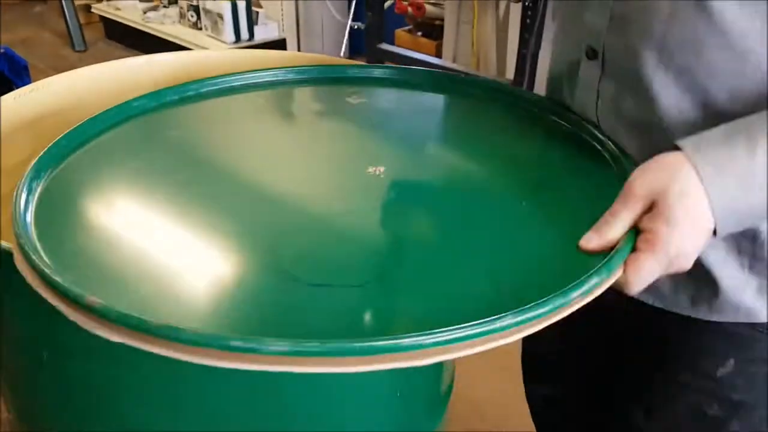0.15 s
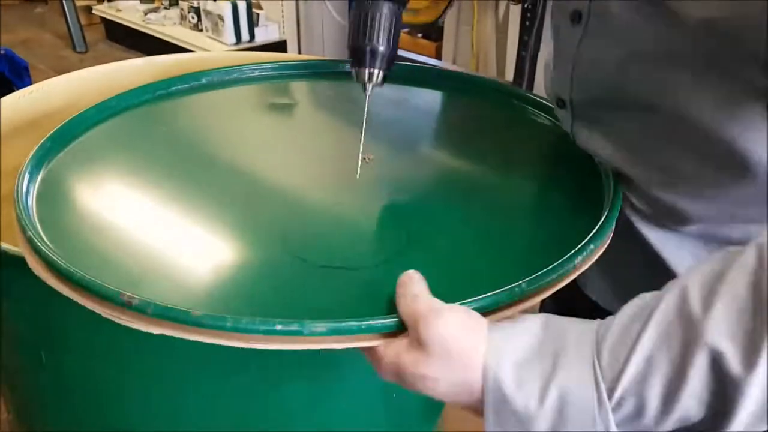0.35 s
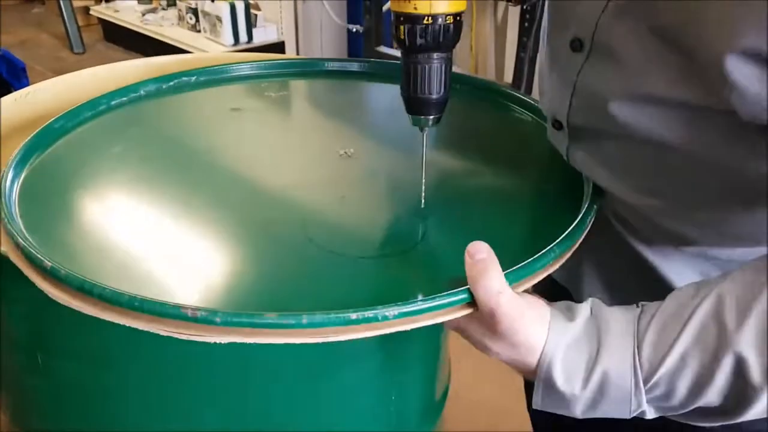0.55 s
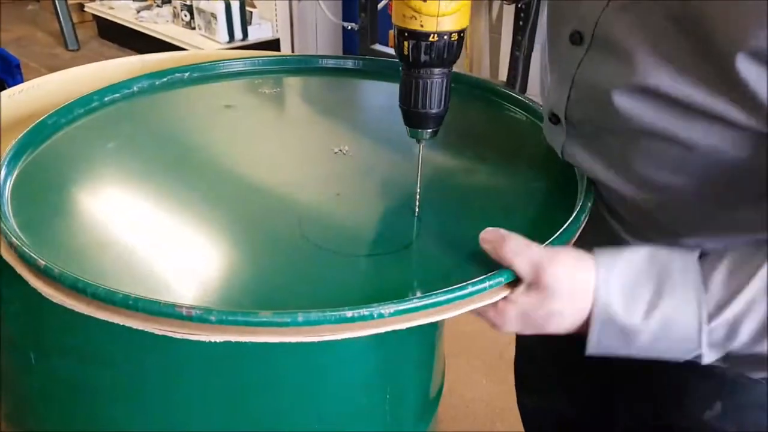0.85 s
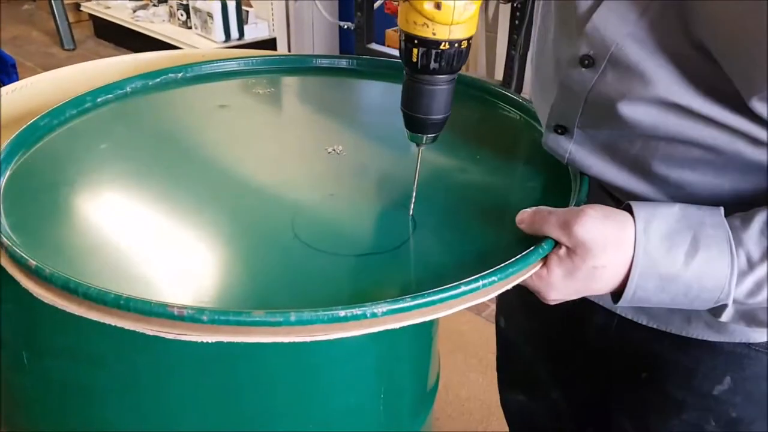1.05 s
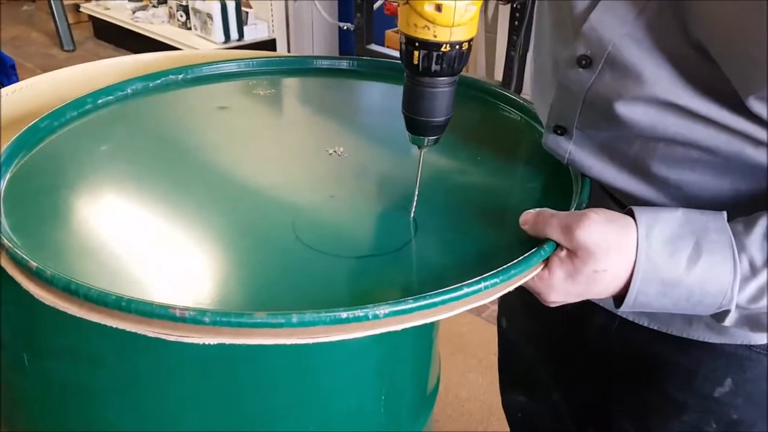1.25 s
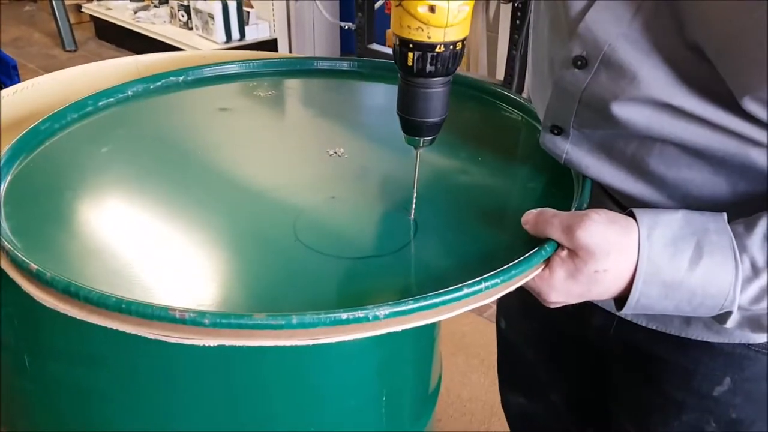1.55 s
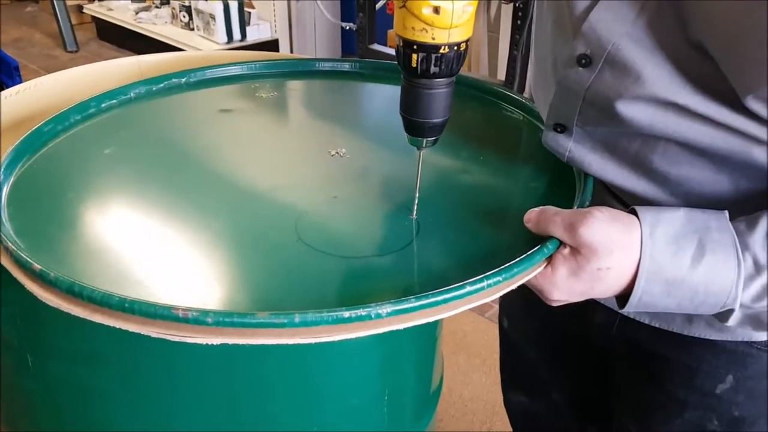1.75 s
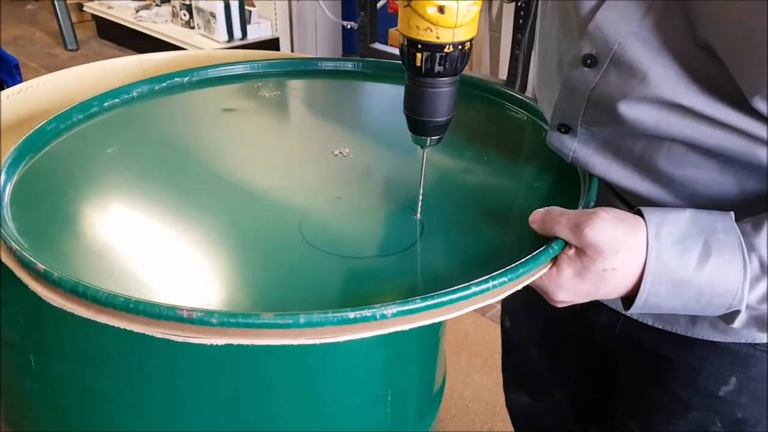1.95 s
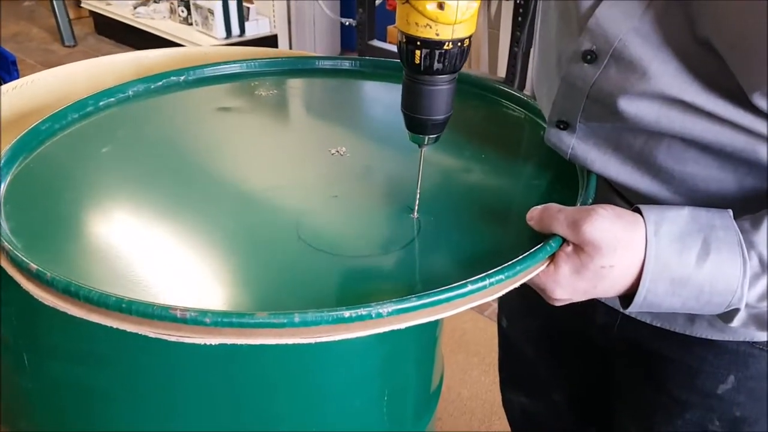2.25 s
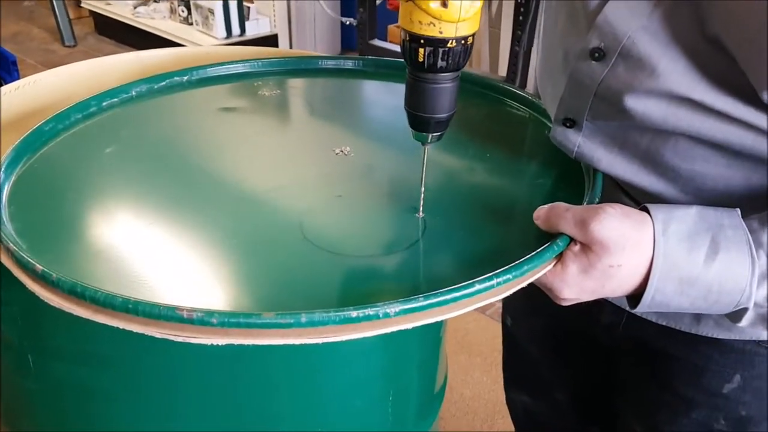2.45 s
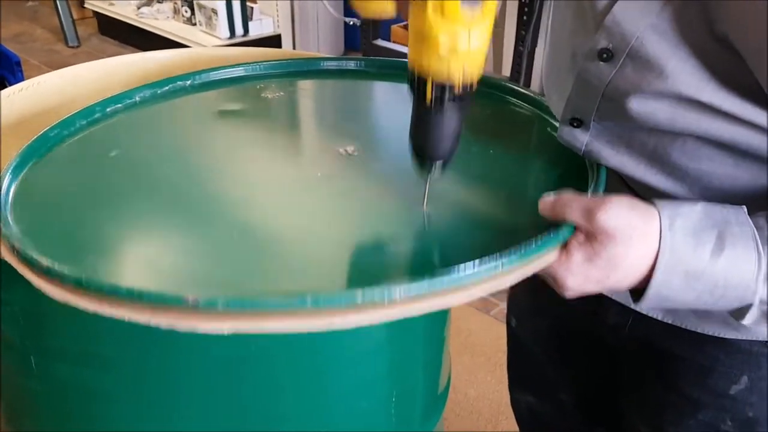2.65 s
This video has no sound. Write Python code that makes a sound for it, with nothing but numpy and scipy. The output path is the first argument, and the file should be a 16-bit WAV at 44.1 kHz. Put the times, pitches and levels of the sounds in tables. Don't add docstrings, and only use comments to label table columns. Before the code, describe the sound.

A cordless drill boring a steel drum lid, heard close in stereo in a short-echo workshop. From 0 to 0.65 s the lid rubs round, loudest near 0.15 s, with faint whistles and dull bumps. After a light tick, the drill ticks and spins up around 0.96 s, whining steadily with rattle and hiss. At 2.7 s the chuck slams, the sheet booms, chips snap, and the muffled motor continues.

```python
import sys
import numpy as np
from scipy import signal
from scipy.fft import rfft, irfft, next_fast_len
from scipy.io import wavfile
from scipy.ndimage import uniform_filter1d

SR = 44100
rng = np.random.default_rng(int(sys.argv[2]) if len(sys.argv) > 2 else 0)


def magnitude_from_level(level_db):
    exponent = np.asarray(level_db, float) / 20
    return 10 ** exponent


def put_to_file(sound):
    columns = np.atleast_2d(sound).T
    safe = np.clip(columns, -1, 1)
    whole_steps = np.round(safe * 32767)
    wavfile.write(sys.argv[1], SR, whole_steps.astype(np.int16))


N = 123479
T = np.arange(N) / SR

# (time [s], speed [turns/s])
MOTOR_SPEED = [(0.96, 120), (1.05, 270), (1.085, 345), (1.11, 394), (1.15, 426), (1.212, 443), (1.25, 443),
               (1.31, 435), (1.44, 432), (1.55, 423), (1.61, 426), (1.83, 413.5), (2.06, 413), (2.24, 407),
               (2.35, 398), (2.51, 395), (2.58, 433), (2.64, 436), (2.8, 420)]
ORDERS = [.797, 2, 2.75, 4, 4.75, 10, 12, 12.406, 12.9284, 13.0592, 13.19, 13.3208, 22.406, 23.78, 24,
          25.141]
# (level [dB rms], wobble [dB], wobble rate [1/s])
ORDER_LEVELS = [(-69, 6.0, 9), (-51, 3, 32), (-62.5, 6, 19), (-59, 2.5, 12), (-63, 4, 13),
                (-44.5, 1.13, 7.7), (-52.5, 1, 20), (-51, 0.5, 12), (-51, 2, 5.7), (-57, 0.5, 8.4),
                (-50, 1.5, 11), (-50.5, 2, 10), (-61.5, 6, 9), (-54.5, 2.5, 36), (-56, 1.5, 15),
                (-49, 2, 22)]
RUN_UP_CHANGE = [-6, -3, -6, -3, -3, 3, -12, -14, -14, -14, -14, -14, -3, -3, 4, 3]
# (time [s], level [dB])
BIT_PRESSURE = [(1.2, 1), (1.25, -3), (1.35, 3.5), (1.5, -0.5), (1.6, -3), (1.75, 1), (1.81, 5),
                (2.0, -0.5), (2.23, 0), (2.34, -0.5), (2.55, -1), (2.7, 0)]
# (frequency [Hz], width [Hz], lift [dB])
TONE_LIFTS = [(824, 27, 6), (3000, 1000, 3), (5225, 610, 8.5), (9460, 470, 10), (10470, 1000, 8)]
# (frequency [Hz], width [Hz], level [dB])
HOUSING_MODES = [(1973, 82, -57), (2850, 22, -57), (3590, 530, -52.5), (5430, 320, -48), (6120, 470, -49)]
# (time [s], peak level [dB])
GEAR_TICKS = [(1.004, -33), (1.0114, -30), (1.0176, -32), (1.0386, -32), (1.0446, -29.5), (1.05, -29)]
# (frequency [Hz], density [dB/Hz])
FAN_HISS = [(200, -28), (1200, -25), (2400, -18), (5000, -12), (9500, -10.5), (12500, -13), (14300, -17.5),
            (16000, -9.5)]
# (frequency [Hz], level [dB], t60 [s])
LID_MODES = [(220, -12.5, 0.31), (344.5, -4.5, 0.41), (487.7, -9, 0.26), (642, -6.5, 0.45),
             (824.8, 1.5, 0.14), (961, 1.5, 0.12), (1148, -2, 0.091), (1500, -0.5, 0.14), (1772, -5, 0.47),
             (1836, -7.5, 0.055), (1996, -3.5, 0.11), (2720, 5, 0.082), (3346, -15, 0.12)]
# (frequency [Hz], level [dB], t60 [s])
CHUCK_MODES = [(2200, -11.5, 0.16), (2708, -10.5, 0.26), (3240, -4.5, 0.15), (3410, -2.5, .15),
               (4204, -10, 0.096), (5486, -17, 0.089), (6557, -9, 0.13), (7600, -19, 0.085),
               (8530, -9, 0.037), (9700, -12, 0.039)]
# (time [s], level [dB])
CHUCK_HITS = [
    (2.7155, -43),
    (2.7235, -36),
    (2.7283, -27.5),
    (2.7305, -32.5),
    (2.7365, -32),
    (2.7405, -30.5),
    (2.747, -36),
    (2.753, -32.5),
    (2.758, -41.5),
]
# (time [s], level [dB], frequency [Hz], t60 [s], swell [s])
SHEET_BOOMS = [
    (2.707, -23, 290, 0.046, 0.0059),
    (2.727, -20, 829, 0.046, .002),
    (2.7275, -22, 1500, 0.033, 0.00091),
    (2.75, -29.5, 1480, .05, 0.0025),
    (2.727, -22, 404, 0.044, 0.0028),
    (2.76, -19.5, 345, 0.19, 0.0063),
    (2.71, -30, 1750, 0.071, .003),
    (2.712, -32, 230, .12, 0.0053),
    (2.748, -36, 829, 0.071, 0.0044),
]
# (time [s], level [dB], lowest [Hz], highest [Hz], t60 [s])
CHIP_SNAPS = [
    (2.7283, -18.5, 7300, 12000, .03),
    (2.736, -28, 7700, 9600, 0.063),
    (3, -30, 7000, 11000, .05),
    (2.788, -25, 9200, 15900, .02),
    (.917, -53.5, 4800, 9800, 0.027),
    (.9585, -48, 2600, 17000, 0.1),
]
# (time [s], level [dB],
# softness [Hz], crack [dB], crack t60 [s])
LID_BLOWS = [(0.736, -58, 1500, 1.5, 0.046), (.917, -63, 6000, 15, 0.025), (.933, -75, 6000, 16, .015),
             (0.9427, -70, 6000, 16, .015), (2.706, -22, 407, 5.5, 0.15), (2.713, -26, 1500, -14, 0.033),
             (2.717, -36, 1500, 2, 0.058), (2.728, -29, 5030, 9.5, 0.097), (2.7281, -37, 9000, 14.5, 0.016),
             (2.74, -36.5, 5050, 11, 0.15), (2.752, -35.5, 6000, 1, 0.088), (2.787, -39, 3000, 11, 0.16)]
# (frequency [Hz], density [dB/Hz])
CRACK_SPECTRUM = [(200, -12.5), (850, -12.5), (2500, -14), (3300, -17.5), (5000, -13), (8600, -16),
                  (16000, -16.5)]
# (peak time [s], level [dB], rise [dB/s], fall [dB/s])
LID_SLIDES = [
    (.0, -102, 300, 103),
    (0.14, -33, 199, 211),
    (0.218, -39.5, 200, 297),
    (.352, -54, 248, 295),
    (.425, -58.5, 254, 110),
    (0.488, -48.5, 98, 354),
    (.62, -57, 257, 350),
    (0.928, -57.5, 405, 294),
]
# (frequency [Hz], density [dB/Hz])
RUB_SPECTRUM = [(88, -67), (150, -32), (231, 1), (376, -40), (545, -5.5), (1360, -2.5), (5360, -10),
                (7500, -7), (16000, -15.5)]
# (frequency [Hz], width [Hz], level [dB])
RIM_WHISTLES = [(8700, 33, -11), (8200, 65, -23), (8400, 40, 5), (9730, 140, 3)]
# (time [s], level [dB], centre [Hz], length [s])
SOFT_BUMPS = [(0.11, -76, 248, 0.018), (0.216, -73, 257, 0.025), (0.349, -48, 690, 0.014),
              (0.484, -57, 288, 0.017), (0.616, -62.5, 260, 0.014), (0.62, -63.5, 815, 0.028),
              (0.03, -63.5, 260, 0.059), (0.927, -53, 626, 0.014), (2.328, -53.5, 473, 0.025),
              (2.62, -59, 214, 0.045), (2.632, -65, 350, 0.026)]
# (middle time [s], level [dB], half length [s])
PALM_SWEEPS = [
    (0.103, -41.5, 0.037),
    (0.149, -33.5, 0.033),
    (0.214, -40, 0.028),
    (0.346, -52.5, 0.024),
    (.45, -51, 0.052),
    (0.617, -64.5, 0.027),
    (0.932, -60, 0.028),
]
# (frequency [Hz], density [dB/Hz])
FLOOR_SPECTRUM = [(30, -2), (110, -22), (170, -2.5), (350, -3), (600, -2.5), (1200, -12.5), (5000, -18.5),
                  (16000, -28)]
# (frequency [Hz], correlation [1])
LIKENESS = [(60, .5), (130, .9), (1000, .9), (2500, .75), (6000, .55), (14000, .35)]
# (frequency [Hz], left over right [dB])
LEFT_OVER_RIGHT = [(60, 6), (240, 0), (950, 2.5), (3770, 4), (15000, 5)]

CARRIER_RATIO = .1308


def rms_one(x):
    return x / np.sqrt(np.mean(x ** 2) + 1e-20)


def passed(x, order, hz, kind="low"):
    return signal.sosfilt(signal.butter(order, hz, kind, fs=SR, output="sos"), x)


def at_hz(points, hz):
    table_hz, values = np.transpose(points)
    return np.interp(np.log(hz), np.log(table_hz), values)


def drift(rate):
    r = np.exp(-80 * np.pi * rate / SR)
    slow = signal.lfilter([1], [1, -2 * r, r * r], rng.standard_normal(N // 40 + 2002))[2000:]
    return np.interp(np.arange(N) / 40, np.arange(len(slow)), rms_one(slow - slow.mean()))


def ring(drive, hz, t60):
    r, w = magnitude_from_level(-60 / (t60 * SR)), 2 * np.pi * hz / SR
    return signal.lfilter([0, np.sin(w)], [1, -2 * r * np.cos(w), r * r], drive + 1e-18)


def sides(hz):
    return magnitude_from_level(at_hz(LEFT_OVER_RIGHT, hz) * np.array([[.5], [-.5]]))


def noise(spectrum, patchy_db):
    out, edges = 0, 30 * 2 ** np.arange(0, 9.4, 1 / 3)
    white = rng.standard_normal((2, 2, N))
    for k, (low, high) in enumerate(zip(edges, edges[1:])):
        mid, side = passed(white[k % 2], 2, [low, high], "band")
        hz = np.sqrt(low * high)
        alike = np.clip(at_hz(LIKENESS, hz), 0, 1)
        gain = magnitude_from_level(at_hz(spectrum, hz) + patchy_db * drift(4.7)) * sides(hz)
        out = out + gain * (np.sqrt(1 + alike) * mid + np.sqrt(1 - alike) * side * [[1], [-1]])
    return rms_one(out)


def lid(drive, damping=1):
    out = 0
    for k, (hz, db, t60) in enumerate(LID_MODES):
        out = out + (-1) ** k * magnitude_from_level(db) * ring(drive, hz, t60 * damping)
    return out


def drill():
    start_s, spin_up_s, stop_s, stall_s = .957, .014, 2.745, .01
    flutter = 1 + .0015 * drift(30.3)
    speed = uniform_filter1d(np.interp(T, *np.transpose(MOTOR_SPEED)), size=900) * flutter
    turns = 2 * np.pi * np.cumsum(speed) / SR
    pace = speed / 420
    on = 1 - np.exp(-np.maximum(T - start_s, 0) / spin_up_s)
    on = on * magnitude_from_level(-13 * np.clip((T - stop_s) / stall_s, 0, 1))
    bite = .006 * np.clip(435 - speed, 0, 40) * (T > 1.2)
    throb = 1 + (.15 + bite) * np.cos(CARRIER_RATIO * turns)
    throb = throb + .25 * np.cos(2 * CARRIER_RATIO * turns + 1)

    near = on * pace ** 0.073 * (gears(throb) + cutting(throb))
    fan = pace ** 1.3 * throb ** 0.043 * magnitude_from_level(-34.5) * noise(FAN_HISS, patchy_db=1.0)
    return near, on * (motor_tones(speed, turns) * pace ** 1.9 + fan)


def motor_tones(speed, turns):
    press_db = np.interp(T, *np.transpose(BIT_PRESSURE))
    run_up = np.clip((1.146 - T) / 0.089, 0, 1)
    rough = passed(rng.standard_normal((2, N)), 2, 350)
    rough = rms_one(rough + rough[0]) * sides(8000)
    tones = magnitude_from_level(-35.5) * run_up * rough * np.sin(24.6 * turns)
    for order, (db, wobble_db, rate), run_db in zip(ORDERS, ORDER_LEVELS, RUN_UP_CHANGE):
        lift_db = 0
        for hz, width, top_db in TONE_LIFTS:
            lift_db = lift_db + top_db / (1 + (2 * (order * speed - hz) / width) ** 2)
        level_db = db + run_db * run_up + press_db * (order in (2, 4))
        level_db = level_db + lift_db + wobble_db * drift(rate)
        blurred = turns + .025 * drift(62)
        wave = np.sin(order * blurred + [[0], [order / 25]])
        tones = tones + magnitude_from_level(level_db) * sides(order * 420) * wave
    return tones


def gears(throb):
    knock = rng.random(N) < 2700 * throb ** 2 / SR
    teeth = magnitude_from_level(2.0 * np.minimum(rng.exponential(1, N), 5)) * rng.choice([-1, 1], N) * knock
    dealt = rng.integers(0, 12, N)
    rattle = 0
    for k, hz in enumerate(np.geomspace(4975, 7490, 12)):
        rattle = rattle + ring(teeth * (dealt == k), hz, 51 / hz)
    housing = 0
    for hz, width, db in HOUSING_MODES:
        housing = housing + magnitude_from_level(db) * rms_one(ring(teeth, hz, 3.7 / width)) * sides(hz)
    ticks = np.zeros(N)
    for s, db in GEAR_TICKS:
        ticks[int(s * SR)] = magnitude_from_level(db - 1)
    ticks = ring(ticks, 5600, .006) - ring(ticks, 6360, 0.009)
    bright = (magnitude_from_level(-44.5) * rms_one(rattle) + ticks) * sides(5500)
    return passed(bright + housing * throb, 2, 1620, "high")


def cutting(throb):
    return magnitude_from_level(-54.5) * rms_one(lid(rng.standard_normal(N) * throb))


def slam():
    hits = np.zeros((len(CHUCK_MODES), N))
    for s, db in CHUCK_HITS:
        strength, sign = rng.standard_normal((2, len(CHUCK_MODES)))
        hits[:, int(s * SR)] = magnitude_from_level(db + 2.1 * strength) * np.sign(sign)
    near = 0
    for row, (hz, db, t60) in zip(hits, CHUCK_MODES):
        near = near + magnitude_from_level(db) * ring(row, hz, t60)
    near = near * magnitude_from_level(-60 * np.maximum(T - 2.766, 0) / .04)
    settle = np.maximum(T - 2.781, 0) / .035
    for s, db, hz, t60, swell in SHEET_BOOMS:
        since = np.maximum(T - s, 0)
        level = magnitude_from_level(db - 60 * (since / t60 + settle)) * (1 - np.exp(-since / swell))
        near = near + level * np.sin(2 * np.pi * hz * since)
    white, snaps = rng.standard_normal((2, N)), 0
    for s, db, low_hz, high_hz, t60 in CHIP_SNAPS:
        bright = passed(white + white[0], 3, [low_hz, high_hz], "band")
        dying = magnitude_from_level(db - 60 * np.maximum(T - s, 0) / t60) * (T > s)
        snaps = snaps + dying * rms_one(bright)
    return near, snaps * sides(10000)


def blows():
    drive, crack = np.zeros(N), np.zeros(N)
    for s, db, soft_hz, crack_db, t60 in LID_BLOWS:
        i = int(s * SR)
        after = T[:N - i]
        push = T * np.exp(-2 * np.pi * soft_hz * T)
        drive[i:] += magnitude_from_level(db) * push[:N - i] / push.sum()
        attack = np.minimum(after * soft_hz / 4, 1)
        crack[i:] += magnitude_from_level(db + crack_db - 60 * after / t60) * attack
    return lid(drive, damping=.65), crack * noise(CRACK_SPECTRUM, patchy_db=4.5)


def slides():
    hand_damping = .45
    rub = 0
    for s, db, rise, fall in LID_SLIDES:
        rub = rub + magnitude_from_level(db - np.where(T < s, rise * (s - T), fall * (T - s)))
    rub = uniform_filter1d(rub, int(0.052 * SR)) * magnitude_from_level(0.7 * drift(68.0))
    white = rng.standard_normal((2, N))
    rim = 0
    for hz, width, db in RIM_WHISTLES:
        rim = rim + magnitude_from_level(db) * rms_one(ring(white + white[0], hz, 2.0 / width)) * sides(hz)
    steady = lid(white[0], hand_damping)
    sheet = magnitude_from_level(-16) * lid(white[0] * rub, hand_damping) / steady.std()
    for s, db, hz, length in SOFT_BUMPS:
        dull = passed(white[1], 2, [hz / 1.43, hz * 1.39], "band")
        sheet = sheet + magnitude_from_level(db) * rms_one(dull) * np.exp(-.5 * ((T - s) / length) ** 2)
    air = passed(rng.standard_normal((2, N)) + white[1], 6, 7700, "high")
    air = rms_one(passed(air, 2, 11200)) * sides(10000)
    sweeps = sum(magnitude_from_level(db) * np.exp(-((T - s) / half) ** 2) for s, db, half in PALM_SWEEPS)
    friction = noise(RUB_SPECTRUM, patchy_db=2.5) + magnitude_from_level(-13) * rms_one(rim)
    return sheet, sweeps * air + rub * friction


def thump():
    since = np.maximum(T - 2.708, 0)
    hz, t60 = 70, 0.25
    low = passed(rng.standard_normal(N), 2, [hz / 2.0, hz * 1.6], "band")
    return magnitude_from_level(-51.5 - 60 * since / t60) * np.minimum(since / 0.0093, 1) * rms_one(low)


def workshop(x):
    t60_s = .35
    size = next_fast_len(N + SR)
    w = 2 * np.pi * np.arange(size // 2 + 1) / size
    lags = (rng.uniform(.012, .04, (2, 6, 1)) * SR).round()
    loop = magnitude_from_level(-60 * lags / SR / t60_s) * np.exp(-1j * w * lags)
    echoes = (loop / (1 - loop)).sum(axis=1)
    return irfft(rfft(x, size) * echoes, size)[:, :N] / 2


def room_floor():
    return magnitude_from_level(-68.5) * noise(FLOOR_SPECTRUM, patchy_db=-0.5)


def scene():
    parts = drill(), slam(), blows(), slides()
    near = sum(part[0] for part in parts)
    wide = sum(part[1] for part in parts)
    room = magnitude_from_level(-7.5) * passed(workshop(near), 1, 900, "high")
    return passed(near + room + wide, 3, 190, "high") + thump() + room_floor()


def roll_off(x):
    return signal.sosfilt(signal.butter(12, 17050, fs=SR, output="sos"), x)


def record(dry):
    top_cut = signal.ellip(12, .5, 70, 15750, fs=SR, output="sos")
    mix = signal.sosfilt(top_cut, dry)
    return roll_off(mix)


dry = scene()
out = record(dry)
put_to_file(out)
```